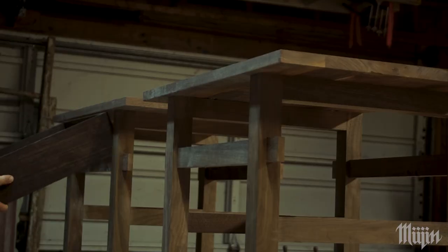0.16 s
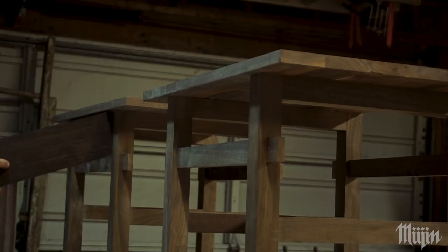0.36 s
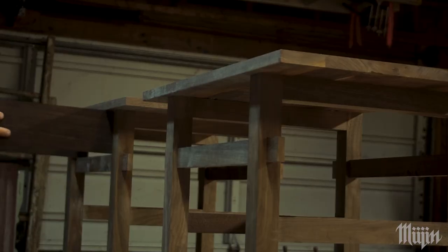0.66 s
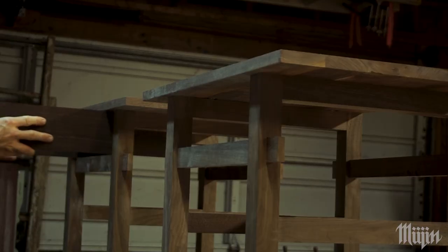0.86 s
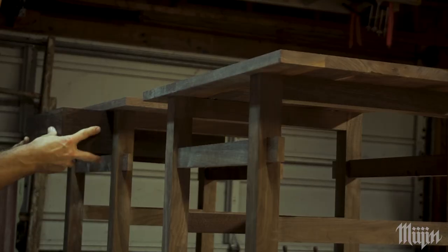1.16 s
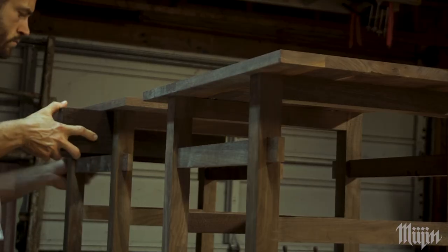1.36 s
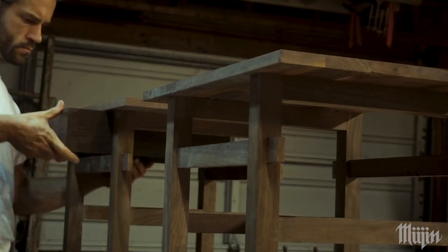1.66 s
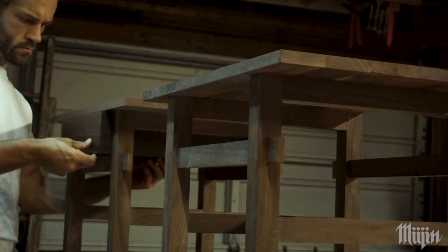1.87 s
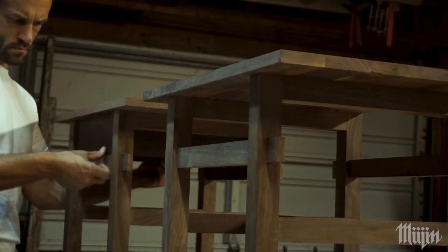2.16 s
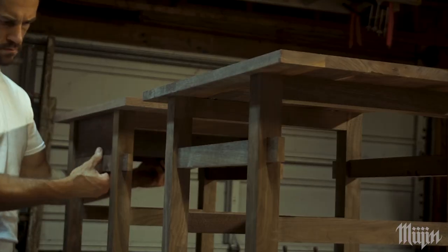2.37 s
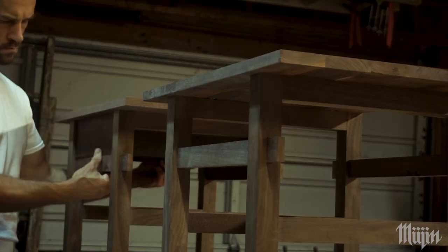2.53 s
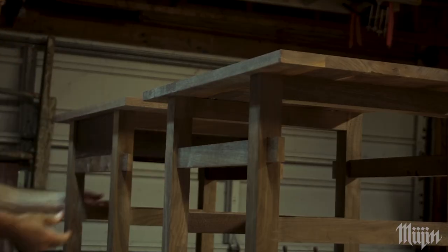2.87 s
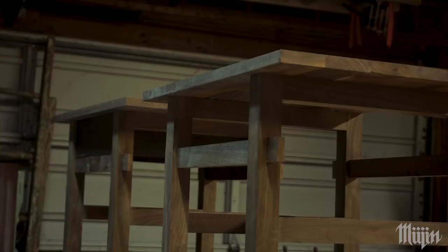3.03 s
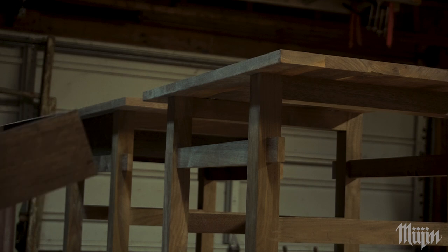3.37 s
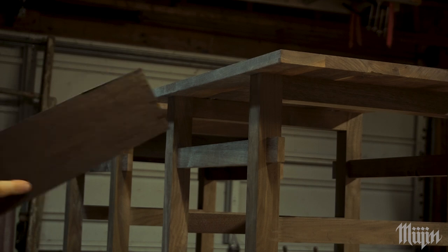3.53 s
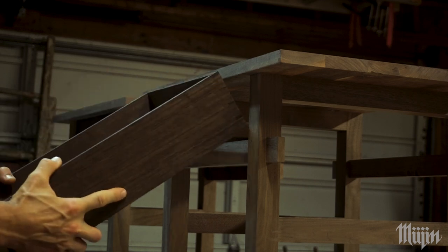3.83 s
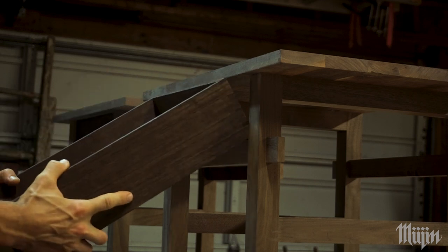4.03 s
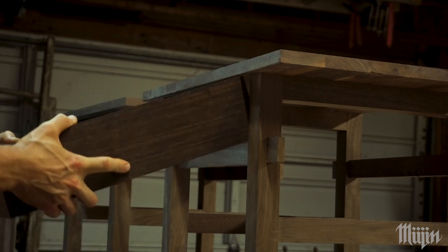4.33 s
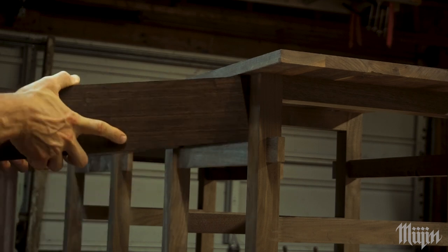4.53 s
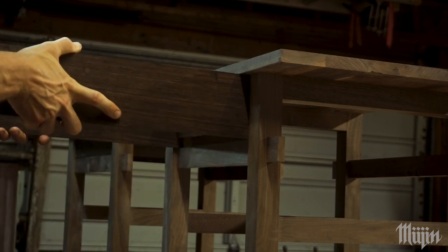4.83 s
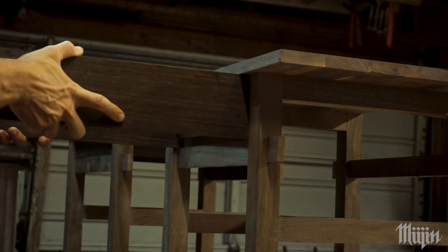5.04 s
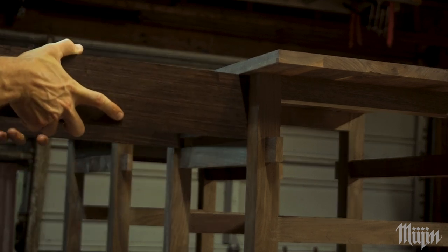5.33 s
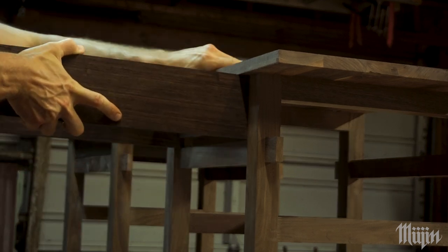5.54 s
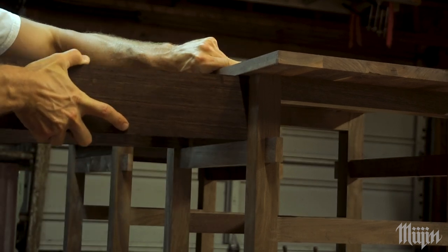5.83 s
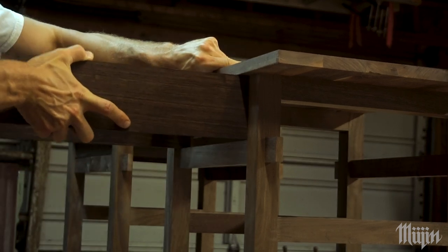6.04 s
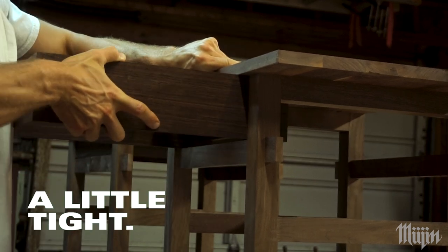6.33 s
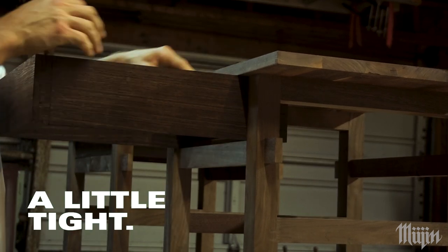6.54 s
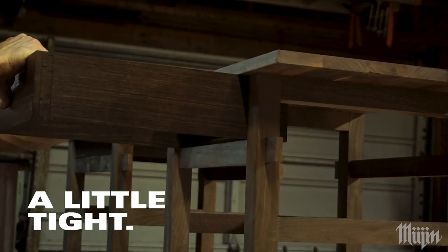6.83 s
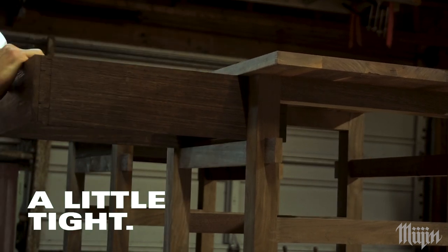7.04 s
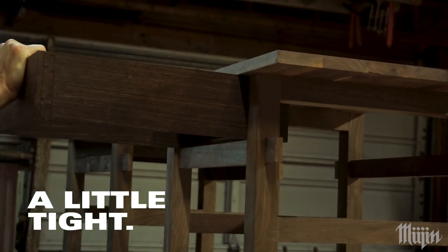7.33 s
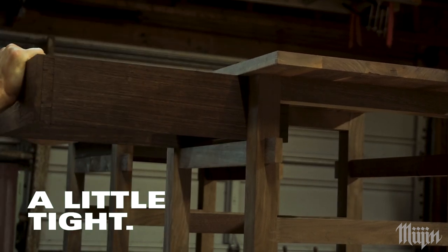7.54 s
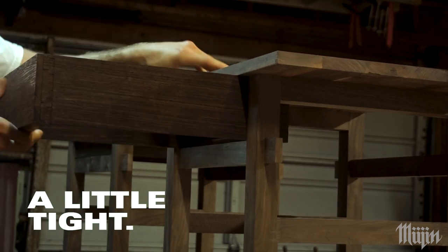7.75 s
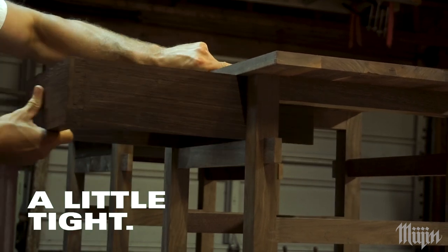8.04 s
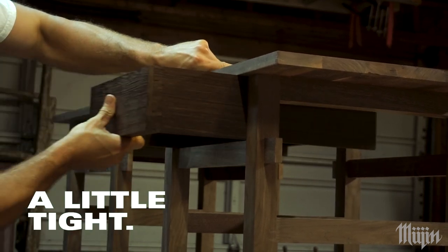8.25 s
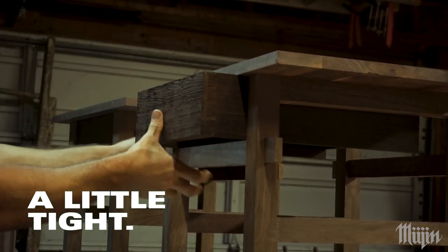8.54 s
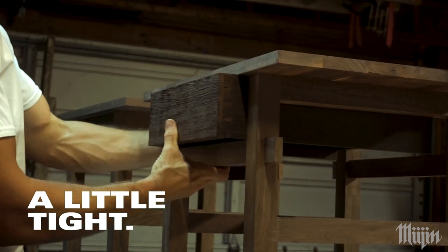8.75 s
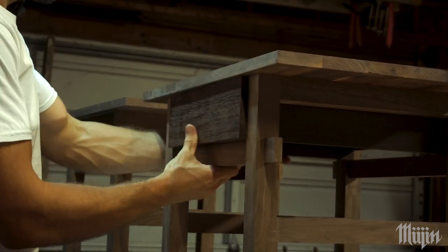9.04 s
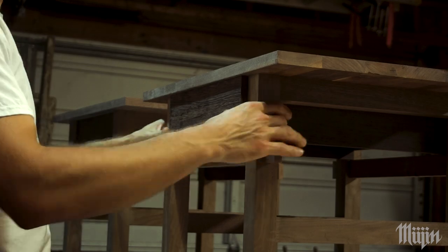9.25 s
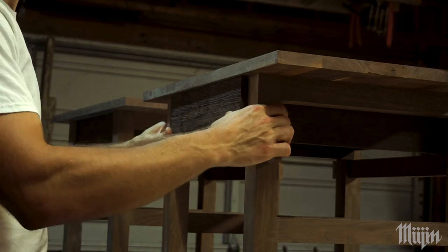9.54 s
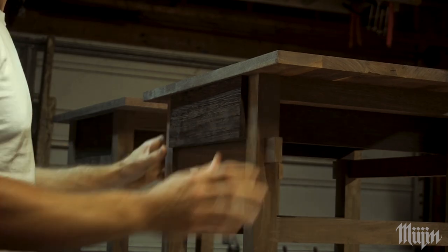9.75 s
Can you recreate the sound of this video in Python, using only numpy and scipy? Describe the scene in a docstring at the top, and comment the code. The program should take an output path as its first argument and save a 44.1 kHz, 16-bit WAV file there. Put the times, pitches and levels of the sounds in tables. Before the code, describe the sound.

A close stereo pickup in a workshop with a very short, dull room tail, over quiet low rumble and steady hiss. From 0 to 1.2 s a wooden drawer taps and scrapes into a table frame, then a strong hollow thump at 1.3 s; softer sliding and knocks follow until 2.5 s. Light dry taps come near 3 s, with two tiny ticks around a brief level dip at 3.25 s. A second drawer clatters in, with a sharp clack at 3.7 s and a knock at 3.95 s. A faint hoarse squeak sounds at 4.6 s. Scrapes and knocks build from 5.6 to 6.3 s, ending in a low table wobble. Lighter handling follows, with faint rising bird whistles around 7.1-7.6 s. Heavy thuds and rough slides hit at 8.1 and 8.3 s, then a hard knock at 8.7 s, smaller bumps, two chirps near 9.1 s, and closing knocks at 9.85 s.

```python
"""In a workshop two wooden drawers are pushed into a table frame, in blows that are short smears.
Knocks and rubbing are noise forces ringing the drawer modes; each knock adds two decaying tones.
A stick-slip tone squeaks once, rising whistles are a bird outside, decaying sines rock the table.
Shaped noise makes the low rumble, the hiss and the room tail; the level dips once between two ticks."""
import sys
import numpy as np
from scipy import signal
from scipy.fft import rfft, irfft, next_fast_len
from scipy.io import wavfile
from scipy.ndimage import uniform_filter1d

SR = 44100
rng = np.random.default_rng(int(sys.argv[2]) if len(sys.argv) > 2 else 0)


def wrap_up_sound(samples):
    """Save the sound to the file named by the first command line argument, as 16-bit audio."""
    columns = np.atleast_2d(samples).T
    # keep every value between -1 and 1, then stretch to whole-number steps
    tamed = np.clip(columns, -1, 1)
    steps = np.round(tamed * 32767).astype(np.int16)
    wavfile.write(sys.argv[1], SR, steps)


N = 436149
SIZE = next_fast_len(N + SR)
HZ = np.maximum(np.arange(SIZE // 2 + 1) * SR / SIZE, 1)
TIME = np.arange(N) / SR


def amp(db):
    """Decibels to gain."""
    return 10 ** (np.asarray(db) / 20)


def in_time(rows):
    """Columns of a curve table at every sample."""
    time_s, *columns = np.transpose(rows)
    return [np.interp(TIME, time_s, column) for column in columns]


def through(x, response):
    """Filter by a response scaled so that white noise keeps its level."""
    response_rms = np.sqrt(np.mean(abs(response) ** 2))
    return irfft(rfft(x, SIZE) * response / response_rms, SIZE)[..., :N]


def coloured(points):
    """Noise of its own in each channel with the given spectrum; rms 1."""
    hz, db = np.transpose(points)
    spectrum_db = np.interp(np.log(HZ), np.log(hz), db)
    return through(rng.standard_normal((2, N)), amp(spectrum_db))


def sides(pan_db):
    """Left and right gains; positive leans left."""
    return amp(np.array([pan_db, -pan_db]) / 2)


def unsteady(span_s):
    """Complex wander of strength and phase that blurs a tone; rms 1."""
    wander = uniform_filter1d(rng.standard_normal((2, N)), int(span_s * SR))
    return (wander[0] + 1j * wander[1]) / np.std(wander) / np.sqrt(2)


# Rumble level: time_s, level_db
RUMBLE_LEVEL = [(0, -49), (1, -50), (2.4, -48.5), (3, -52), (4.2, -49.5), (5.9, -51.5), (7, -50.5),
                (8.6, -50.5), (9.25, -54.5), (9.45, -45), (9.7, -52)]
# Rumble spectrum, relative: freq_hz, density_db
RUMBLE_SPECTRUM = [(8.8, -24), (15, -1), (43, -2.5), (70, -6.5), (101, -10), (119, -15.5), (200, -19),
                   (260, -52), (440, -120)]


def rumble():
    """Low noise of slowly changing level."""
    return amp(in_time(RUMBLE_LEVEL)[0]) * coloured(RUMBLE_SPECTRUM)


# Hiss spectrum, relative: freq_hz, density_db
HISS_SPECTRUM = [(59, -44), (100, -2), (140, -8), (386, -8.5), (487, -17), (861, -14.5), (1370, -19),
                 (14500, -21.5), (15500, -13.5)]
HISS_DB = -50.5


def hiss():
    """Steady broadband noise."""
    return amp(HISS_DB) * coloured(HISS_SPECTRUM)


ROOM_T60_S, ROOM_DB, ROOM_CUT_HZ = 0.073, -6.5, 8700


def workshop(x):
    """Short dull room tail: decaying noise, its own on each side."""
    t = np.arange(SR // 2) / SR
    decay = amp(-60 * t / ROOM_T60_S) * np.minimum(t / 0.0023, 1)
    tail = rng.standard_normal((2, len(t))) * decay
    return amp(ROOM_DB) * through(x, rfft(tail, SIZE) / (1 + 1j * HZ / ROOM_CUT_HZ))


# Bird whistles: start_s, level_db
BIRD_CHIRPS = [(2.236, -64), (7.141, -54), (7.24, -53), (7.335, -56), (7.428, -54.5), (7.537, -57),
               (7.63, -61), (9.105, -57), (9.206, -54)]
CHIRP_FROM_HZ, CHIRP_TO_HZ, CHIRP_S = 2250, 2790, 0.049


def bird():
    """Short rising whistles, made hoarse by random strength and phase."""
    out = np.zeros(N, complex)
    for start_s, level_db in BIRD_CHIRPS:
        u = np.clip((TIME - start_s) / CHIRP_S, 0, 1)
        cycles = CHIRP_S * (CHIRP_FROM_HZ * u + (CHIRP_TO_HZ - CHIRP_FROM_HZ) * u ** 2 / 2)
        out += amp(level_db) * np.sin(np.pi * u) * np.exp(2j * np.pi * cycles)
    return np.real(out * (.6 + np.array([unsteady(.0015), unsteady(.0015)])))


# Table frame rocking on the floor: start_s, level_db, freq_hz, t60_s
FRAME_ROCKING = [(6.335, -29, 33.8, 0.68), (8.086, -29, 36, 0.63), (9.01, -40, 40, 0.28),
                 (6.315, -22.5, 115, 0.092), (8.11, -35, 65, .2), (9.849, -33, 71.5, 0.22)]


def rocking():
    """The whole table sways on its legs: decaying low sines."""
    out = np.zeros(N)
    for start_s, level_db, freq_hz, t60_s in FRAME_ROCKING:
        t = np.maximum(TIME - start_s, 0)
        swell = np.minimum(t / 0.0095, 1)
        out += amp(level_db - 60 * t / t60_s) * swell * np.sin(2 * np.pi * freq_hz * t)
    return out


# Tight runner, level before the wander: time_s, level_db
SQUEAK_LEVEL = [(4.48, -62), (4.54, -59), (4.57, -61), (4.6, -53), (4.63, -85), (4.67, -51), (4.7, -52),
                (4.73, -80)]
SQUEAK_HZ, SQUEAK_OCTAVE_DB = 1166, -7


def squeak():
    """Hoarse stick-slip tone with its octave, each wandering in strength and phase."""
    phase = 2 * np.pi * SQUEAK_HZ * TIME
    sounding = (TIME > SQUEAK_LEVEL[0][0]) & (TIME < SQUEAK_LEVEL[-1][0])
    tone = np.exp(1j * phase) * (0.3 + .9 * unsteady(0.0039))
    octave = amp(SQUEAK_OCTAVE_DB) * np.exp(2j * phase) * (.4 + .9 * unsteady(.004))
    return sounding * amp(in_time(SQUEAK_LEVEL)[0]) * (tone + octave).real


TILT_HZ, DULL_HZ = 1480, 15800


def wood(low_hz, high_hz, modes):
    """Response of a drawer within one band: its modes over a continuum that dulls upwards."""
    out = 1
    for freq_hz, width_hz, lift_db in modes:
        damping = 1j * HZ * width_hz
        out = out * (1 + (amp(lift_db) - 1) * damping / (freq_hz ** 2 - HZ ** 2 + damping))
    out = out / (1 + 1j * HZ / TILT_HZ) / (1 + (HZ / DULL_HZ) ** 4)
    band = signal.butter(3, [low_hz, high_hz], "band", fs=SR, output="sos")
    return out * signal.sosfreqz(band, HZ, fs=SR)[1]


# First drawer's modes, lift over the continuum: freq_hz, width_hz, lift_db
FIRST_MODES = [(217, 79, 14), (337, 68, 7.5), (414, 11, -1.5), (547, 18, 0.5), (683.5, 19, 11.5),
               (913, 59, 6), (1163, 89, 4), (1412, 68, 3.5), (1740, 106, 1), (1860, 34, 2.5),
               (2054, 140, 4.5), (2270, 80, 4.5), (2740, 160, 3), (3090, 71, 3), (3720, 50, 4),
               (4183, 150, 3.5), (7040, 130, -18), (8860, 2200, 3)]
# Second drawer's own three lowest modes: freq_hz, width_hz, lift_db
SECOND_LOW_MODES = [(227, 126, 8.2), (351.5, 68, 8.6), (436, 32, 4.4)]
SECOND_FROM_S = 3.26


def drawers(force, band):
    """The force rings the first drawer, later the second, which shares the upper modes."""
    second = TIME > SECOND_FROM_S
    first_ring = through(force * ~second, wood(*band, FIRST_MODES))
    second_ring = through(force * second, wood(*band, SECOND_LOW_MODES + FIRST_MODES[3:]))
    return first_ring + second_ring


SHARED_POWER = 0.48


def contact(rough_db, lag_s):
    """Uneven force of wood on wood, about half its power common to both channels, left later."""
    step_db = rough_db * rng.standard_normal(N // 128 + 1)   # one step per 128 samples
    grit = rng.standard_normal((3, N)) * amp(step_db).repeat(128)[:N]
    common = np.array([np.roll(grit[0], round(lag_s * SR)), grit[0]])
    both = np.sqrt(SHARED_POWER) * common + np.sqrt(1 - SHARED_POWER) * grit[1:]
    return both / np.std(both)


# Drawer slides, boom and dust against the scrape:
# start_s, peak_s, end_s, scrape_db, boom_db, dust_db
DRAWER_SLIDES = [(0.627, 1.137, 1.4, -48.5, 2, -5), (1.678, 1.73, 2.005, -45.5, 7.5, -5.5),
                 (1.936, 2.137, 2.5, -55, 5, -5.5), (2.687, 2.818, 2.8, -64.5, -18, 8.5),
                 (0, -0, 0.046, -62.5, 18, -20), (1.273, 1.314, 1.306, -50.5, 6, 6),
                 (2.5, 2.587, 2.54, -60, 13.5, -8), (2.95, 3.048, 3.18, -60.5, -20, 11.5),
                 (3.333, 3.396, 3.47, -49.5, -16, 3), (3.51, 3.69, 3.3, -53, -35, -4),
                 (4.46, 4.598, 4.8, -58, 1, -15), (5.644, 5.714, 5.93, -53.5, 5, -21),
                 (5.757, 5.845, 6, -47, -13, -12), (6.043, 6.233, 6.34, -45, 1.8, -17),
                 (6.262, 6.292, 6.4, -43.5, 1, -3), (6.46, 6.52, 6.6, -54, -28, 6),
                 (6.554, 6.646, 6.71, -61.5, -17, 10.5), (6.768, 6.904, 7.12, -54.5, 4, -7),
                 (7.665, 7.814, 7.96, -54.5, -6, -5), (8.042, 8.216, 8.38, -41.5, 7.5, -7),
                 (8.314, 8.408, 8.57, -43.5, -8.5, -4.5), (8.621, 8.654, 8.73, -41.5, -25, -8.5),
                 (8.707, 8.782, 8.88, -49.5, -3, -0.5), (8.775, 8.933, 9.15, -51, 6, -8),
                 (9.41, 9.505, 9.2, -53, 8, -14), (9.25, 9.28, 8.4, -52, -11, -9),
                 (9.71, 9.78, 9.6, -48.5, -14, -9), (9.822, 9.882, 14, -50, -14, 1)]
# Steady handling: level_db of boom, scrape, dust
HANDLING_LEVELS_DB = [-63.5, -62.5, -79.5]
SLIDE_EDGE_DB = -12.5   # at both ends of a slide, against its peak


def pressure():
    """Gain of boom, scrape and dust: steady handling plus slides that swell, fade and stop short."""
    power = amp(HANDLING_LEVELS_DB)[:, None] ** 2 + np.zeros(N)
    for start_s, peak_s, end_s, scrape_db, boom_db, dust_db in DRAWER_SLIDES:
        # a peak_s past end_s leaves the times unsorted: the stroke then jumps
        corners_s = [start_s - .02, start_s, peak_s, end_s, end_s + .02]
        stroke_db = np.interp(TIME, corners_s, [-40, SLIDE_EDGE_DB, 0, SLIDE_EDGE_DB, -40])
        part_db = np.array([[boom_db], [0], [dust_db]])
        power = power + amp(scrape_db + stroke_db + part_db) ** 2
    return np.sqrt(power)


# Boom, scrape, dust: low_hz, high_hz
RUBBING_BANDS = [(120, 600), (600, 3000), (3000, 17000)]
# Rubbing balance: time_s, left_minus_right_db
RUBBING_PAN = [(0, 0), (3, -1.5), (4, 2), (9.89, -0.5)]
# Lag of the left channel by band, low to high: lag_s
LEFT_LAG_S = [.0019, 0.00117, .0008, .0006]


def rubbing():
    """Fibres catch and slip in clumps along the runners and drive the same modes as the knocks."""
    clumps = uniform_filter1d(rng.standard_normal(N), size=700)
    grip = amp(2.5 * clumps / np.std(clumps)) * sides(in_time(RUBBING_PAN)[0])
    return sum(drawers(gain * grip * contact(1.9, lag_s), band)
               for gain, band, lag_s in zip(pressure(), RUBBING_BANDS, LEFT_LAG_S))


RISE_S, LEAD_SHARE = .016, 0.63   # time_s falls at this share of the rise
LEAD_IN_S, LEAD_IN_DB = 0.035, -12.5   # a faint lead-in grows before each blow


def blow_rise(t):
    """Force swells from t = 0, after a faint growing lead-in."""
    main = np.sin(np.pi / 2 * np.clip(t / RISE_S, 0, 1)) ** 3
    lead_in_db = LEAD_IN_DB + 40 * np.minimum(t - RISE_S / 2, 0) / LEAD_IN_S
    return np.maximum(main, amp(lead_in_db) * (t < RISE_S))


# Knocks; body before CREST_DB, hollow, hard and crack against body, sing sets the two tones:
# time_s, body_db, hollow_db, hard_db, crack_db, low_note_hz, high_note_hz, sing_db, t60_s
DRAWER_KNOCKS = [(0.225, -50.5, 20, -26, -16, 186, 1770, -11, 0.034),
                 (0.316, -60, 17.5, -26, -13, 220, 1620, 4.5, 0.04),
                 (0.424, -43, 2, -13.5, -14, 343, 3450, -2.5, 0.14),
                 (0.477, -41.5, -0.5, -12.5, -16, 212, 1380, -7, 0.11),
                 (0.646, -35, 7, -36, -30, 392, 1720, -4.5, 0.06),
                 (0.715, -51.5, 10, -10, -13, 201, 1870, 2, 0.07),
                 (0.798, -51.5, 8, -8, -5, 207, 2370, 5, 0.048),
                 (1.18, -48.5, 11, -23, -13, 217, 2780, 4.5, 0.042),
                 (1.216, -28, -26, -12.5, -21, 760, 1820, -6, 0.027),
                 (1.278, -45.5, 6, -3, 0, 210, 2280, -3, 0.075),
                 (1.336, -13.5, 0.5, -24, -35, 298, 1460, -6, 0.074),
                 (1.385, -27.5, -17, -10, -26, 412, 1423, 1, 0.041),
                 (1.745, -37.5, -2.5, -21, -24, 252, 1575, 4.5, 0.13),
                 (1.83, -36.5, 6, -16, -14, 277, 1430, -3, 0.06),
                 (1.908, -44.5, 9.5, -22, -9, 232, 1410, 1, 0.041),
                 (2.247, -46, -4, -10, -17, 394.5, 1400, 5, 0.032),
                 (2.285, -52, 9, -11, -11, 347, 1780, -4, 0.077),
                 (2.374, -41.5, 9.5, -12, -17, 214, 2560, -5, 0.049),
                 (2.738, -61, -12, 3, 1, 197, 3460, -5, 0.055),
                 (2.961, -49.5, -29, 3, 15.5, 790, 1760, -10, 0.083),
                 (3.047, -51.5, -9, 0.5, 3, 315, 1810, -3, 0.061),
                 (3.08, -55, -14, 5, -4, 684, 2050, -1, 0.033),
                 (3.342, -50, -17, 2, -10, 228, 1650, -6, 0.15),
                 (3.388, -44, -22, 0.5, 0, 888, 1680, -3, 0.07),
                 (3.44, -40.5, -22, 7, 7.5, 1310, 3560, -2, 0.036),
                 (3.54, -42.5, -17, 4, 0.5, 620, 1684, -9, 0.055),
                 (3.605, -48.5, -15, 9, 3, 1245, 2570, -8, 0.061),
                 (3.651, -44.5, -5, 0, 2.5, 956, 1625, -5, 0.04),
                 (3.705, -22, -24, 6.5, 2.5, 641, 2300, -10.5, 0.039),
                 (3.952, -34, 4.5, -13, -31, 350, 1580, -3.5, 0.055),
                 (4.191, -47, 5, -7, -18, 207, 1550, -5, 0.072),
                 (4.334, -55, 10, -10, 2, 214, 2110, -1, 0.052),
                 (4.896, -38, -12.5, -12.5, -23, 425, 2060, -3, 0.063),
                 (5.223, -44.5, -1, -9, -18, 432, 1865, -3.5, 0.053),
                 (5.308, -46.5, 1, -5.5, -8, 252, 2010, -1, 0.065),
                 (5.394, -47.5, -7, -1, -3, 934, 2320, -7, 0.089),
                 (5.761, -36, -3, -5.5, -8, 453, 2050, -7, 0.086),
                 (5.911, -40.5, -1.5, -24, -27, 378, 2380, -3, 0.06),
                 (6.082, -39.5, -1, -3.5, -14, 380, 2405, -10, 0.037),
                 (6.128, -38, -5, -8, -16, 985, 2350, -4.5, 0.096),
                 (6.188, -29, -7, -1, -10, 1180, 1564, 0.5, 0.032),
                 (6.306, -29, 2, -6.5, -11, 241.4, 2310, -3, 0.062),
                 (6.338, -25, -4, -14.5, -14, 620, 2130, -5, 0.039),
                 (6.495, -45, -6, 1, 1, 1235, 2160, -5.5, 0.07),
                 (6.725, -36.5, -6, -13.5, -19, 860, 2210, -3, 0.052),
                 (6.837, -42.5, 0.5, -27, -17, 458, 1430, -4, 0.055),
                 (6.905, -38, -12, -24, -21, 356.4, 2424, -7, 0.049),
                 (6.942, -37.5, -1, -14, -16, 334, 1490, -6, 0.11),
                 (7.02, -43, 6.5, -6.5, -5.5, 283, 1807, -1, 0.082),
                 (7.177, -40.5, 10.5, -18, -27, 248, 1890, -5.5, 0.059),
                 (7.258, -43, -9, -16, -25, 846, 2710, -2.5, 0.067),
                 (7.363, -40, -2.5, -17, -29, 208, 1630, -8.5, 0.11),
                 (7.649, -45.5, -2, -4, -4, 273, 2650, 1, 0.058),
                 (7.735, -45.5, -20, 9, 2.5, 695, 1870, -14, 0.033),
                 (7.875, -38, -3, -42, -32, 692, 1620, 1.5, 0.046),
                 (8.066, -13.5, -4, -11, -14.5, 440, 2010, -4, 0.048),
                 (8.093, -22.5, -4.5, -27, -31, 244, 1950, 3, 0.048),
                 (8.131, -21, -7, -14, -42, 1197, 1900, -7, 0.047),
                 (8.154, -26.5, -1, -22, -18.5, 368, 1670, -1, 0.082),
                 (8.186, -21, -7, -15, -32, 828, 2050, -9, 0.057),
                 (8.256, -32, -6, -28, -18, 832, 1700, 0.5, 0.04),
                 (8.309, -14.5, -12, -31, -33, 881, 1690, -10, 0.043),
                 (8.661, -23, -14, 3, -5, 502.4, 1980, -5.5, 0.051),
                 (8.831, -34, 7, -18, -24, 247, 1555, -1, 0.051),
                 (9.008, -26.5, 5, -16, -16, 197, 1780, -4, 0.047),
                 (9.128, -43.5, -5, -10, -13, 864, 2700, -4.5, 0.071),
                 (9.268, -45, -6, 0.5, -11, 183.1, 1540, -7.5, 0.076),
                 (9.453, -36.5, -3, -2, -14, 870, 1650, -7.5, 0.037),
                 (9.739, -50, -10, 6.5, -12, 1010, 1540, -4, 0.074),
                 (9.851, -26, 2, -4, -11.5, 421, 1660, -5, 0.035),
                 (9.871, -29, -14, 2.5, 1, 933, 2490, -2, 0.051)]
# Hollow, body, hard, crack: low_hz, high_hz
BLOW_BANDS = [(175, 500), (500, 1500), (1500, 4500), (4500, 17000)]
# Divisor of the dB fall by band: a larger one rings longer
FALL_DIVISOR = [2, 0.88, 2.5, 1.64]
FALL_BEND, CREST_DB, HIGH_NOTE_DB = 1.36, -4.5, 1
PAN_DB_PER_DB, PAN_DB = .1, 0.54   # hard blows lean left, hollow ones right


def knocks():
    """Each blow is a brief swell of force in four bands, and two tones sing out."""
    t = np.arange(SR // 2) / SR
    length = len(t)
    bursts = np.zeros((len(BLOW_BANDS), 2, N + length))
    notes = np.zeros((2, N + length), complex)
    t = t - LEAD_IN_S
    rise = blow_rise(t)
    for (time_s, body_db, hollow_db, hard_db, crack_db,
         low_hz, high_hz, sing_db, t60_s) in DRAWER_KNOCKS:
        at = round((time_s - LEAD_SHARE * RISE_S - LEAD_IN_S) * SR)
        edge_db = np.clip(hard_db - hollow_db, -30, 30)
        band_db = [hollow_db, 0, hard_db, crack_db]
        pan = sides(PAN_DB + PAN_DB_PER_DB * edge_db)[:, None]
        swell = rise * pan * amp(body_db + CREST_DB)
        # holds, then drops fast
        fall_db = -60 * (np.maximum(t - RISE_S, 0) / max(t60_s, .01)) ** FALL_BEND
        for k, db in enumerate(band_db):
            bursts[k, :, at:at + length] += swell * amp(db + fall_db / FALL_DIVISOR[k])
        low_db = band_db[int(low_hz > BLOW_BANDS[0][1])]   # follows its band
        low = amp(low_db) * np.exp(2j * np.pi * low_hz * t)
        high = amp(hard_db + HIGH_NOTE_DB) * np.exp(2j * np.pi * high_hz * t)
        notes[:, at:at + length] += swell * amp(fall_db + sing_db) * (low + high)
    blows = sum(drawers(burst[:, :N] * contact(1.26, lag_s), band)
                for burst, band, lag_s in zip(bursts, BLOW_BANDS, LEFT_LAG_S))
    blur = 1.34 + 1.37 * np.array([unsteady(0.0079), unsteady(0.014)])
    return blows + np.real(notes[:, :N] * blur)


def scene():
    """Sources with their room tail, over rumble, hiss and rocking."""
    near = knocks() + rubbing() + squeak() + bird()
    floor = rumble() + hiss()
    return near + workshop(near) + floor + rocking() * sides(0.5)[:, None]


# Ticks at both ends of the dip: time_s, tick_db
DIP_TICKS = [(3.242, -26), (3.281, -33)]
DIP_DB, CUTOFF_HZ = -5.5, 15830


def record(dry):
    """The level dips briefly, with a one-sample tick at both ends; the top is cut."""
    dipped = (TIME > DIP_TICKS[0][0]) & (TIME < DIP_TICKS[1][0])
    out = dry * amp(DIP_DB * dipped)
    for time_s, tick_db in DIP_TICKS:
        out[:, round(time_s * SR)] += amp(tick_db)
    return signal.sosfilt(signal.cheby2(16, 70, CUTOFF_HZ, fs=SR, output="sos"), out)


dry = scene()
out = record(dry)
wrap_up_sound(out)
```